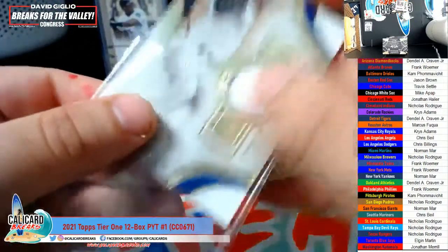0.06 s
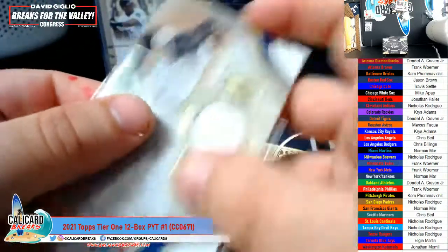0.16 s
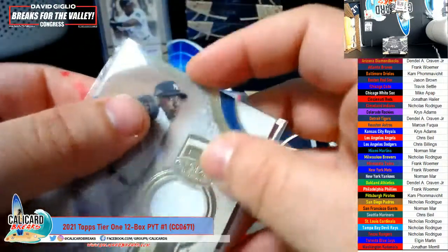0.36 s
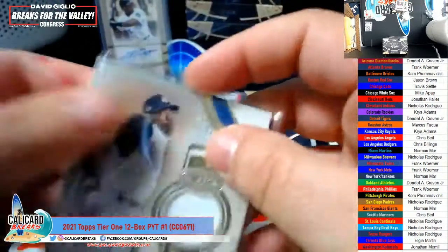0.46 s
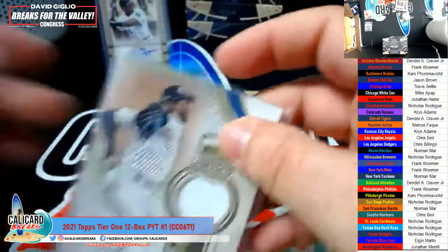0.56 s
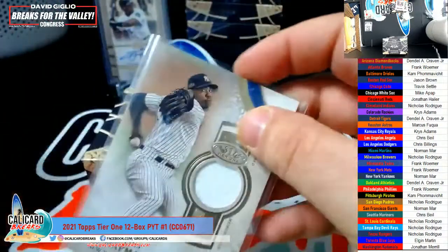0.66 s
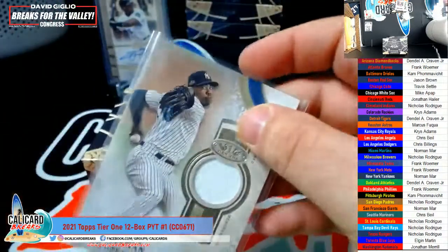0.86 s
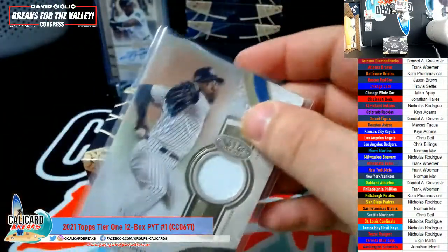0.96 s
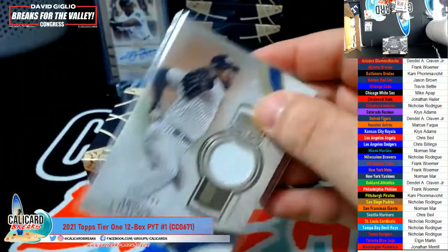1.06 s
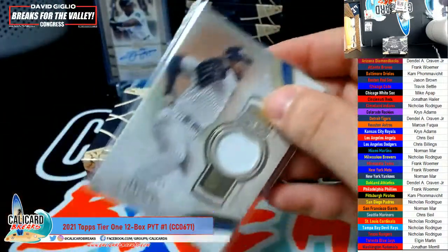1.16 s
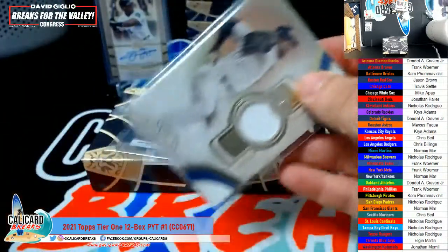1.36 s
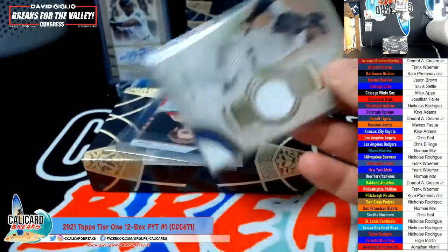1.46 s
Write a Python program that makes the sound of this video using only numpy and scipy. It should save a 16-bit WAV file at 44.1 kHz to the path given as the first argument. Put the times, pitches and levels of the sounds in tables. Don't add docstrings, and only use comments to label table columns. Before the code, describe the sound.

A stiff card hisses into a thin plastic sleeve with sharp snaps, then faint creaks and rubs

```python
import sys
import numpy as np
from scipy import signal
from scipy.fft import rfft, irfft
from scipy.io import wavfile

SR = 44100
rng = np.random.default_rng(int(sys.argv[2]) if len(sys.argv) > 2 else 0)


def log_audio(samples):
    frames = np.atleast_2d(samples).T
    limited = np.clip(frames, -1, 1)
    pcm = np.round(limited * 32767).astype(np.int16)
    wavfile.write(sys.argv[1], SR, pcm)


def volts(x):
    e = np.asarray(x, float) / 20
    return 10 ** e


N = 66150

# freq_hz, density_db
RUMBLE_SPECTRUM = [(12, -38.5), (20, 6), (65, 1.5), (86, -16), (123, -16), (261, -16.5), (351, -12),
                   (387, -21.5), (1000, -37.5), (1300, -72.5), (2200, -120)]
# freq_hz, density_db
HISS_SPECTRUM = [(590, -29), (1000, -2), (1580, -7.5), (1740, -6.5), (2590, -8), (4590, -15), (6770, -11.5),
                 (15000, -26.5), (16500, -31)]
# freq_hz, likeness_0_to_1
PORT_LIKENESS = [(30, .99), (120, .8), (300, 0.9), (800, .7), (2000, 0), (8000, .2)]
# pitch_hz, level_db
MACHINE_TONES = [(26.9, -61), (59.2, -63), (118.4, -64.5), (290.7, -75), (349.9, -70)]
# start_s, length_s, level_db, pitch_hz, width_hz
CREAKS = [(.860, 0.028, -60, 269.6, 50.2), (0.914, 0.02, -64.5, 630, 69.8), (.945, 0.027, -60, 544, 69.5),
          (0.947, 0.027, -67, 1237, 80), (0.996, 0.01, -64, 671, 120), (1.020, 0.015, -48, 550, 110),
          (1.033, .006, -41, 575, 70), (1.032, .012, -54.5, 809, 160), (1.130, .008, -52, 750, 130),
          (1.146, 0.031, -58.5, 228, 39.8), (1.168, .012, -53.5, 2550, 280), (1.181, .007, -53, 2500, 260),
          (1.17, 0.015, -65, 844, 99), (1.240, .008, -41, 2200, 170), (1.238, 0.0087, -53, 1116, 161),
          (1.250, .007, -44, 2196, 200), (1.247, 0.018, -55.5, 1183, 121), (1.269, 0.0167, -52, 324.3, 91),
          (1.269, 0.016, -58, 830, 240), (1.296, 0.019, -57.5, 301, 69.5), (1.394, 0.03, -60, 292, 35),
          (.73, 0.052, -60.5, 355, 29.8), (1.240, 0.0047, -52, 2760, 300), (1.42, .03, -62, 312, 35),
          (1.445, .03, -65, 335, 35)]
# start_s, length_s, level_db, centre_hz, width_octaves
RUBS = [(0.51, 0.017, -63.5, 9500, 0.34), (.507, 0.019, -66, 5000, 3.0), (.640, .04, -80, 6700, 1.5),
        (0.84, .06, -71, 1100, 1.6), (.938, .01, -70, 8000, 1.6), (0.904, 0.11, -64.5, 670, 1.21),
        (1.018, 0.071, -67, 970, 1.6), (1.146, 0.067, -68, 3500, 1.6), (1.236, 0.038, -65, 5300, 1.9),
        (1.255, 0.036, -56, 600, 1.7), (1.404, .011, -58, 7300, 1.0), (1.426, .013, -60.5, 7500, 1.0),
        (1.392, .056, -67, 7000, 1.4), (1.479, 0.008, -72, 1800, 2.9), (1.075, 0.36, -69, 710, 1.6),
        (1.236, 0.025, -66, 1100, 1.06), (1.261, 0.041, -70.5, 6200, 1.5), (1.198, .035, -71, 4500, 1.8),
        (1.424, .022, -68, 1200, 1.58), (1.021, 0.03, -77, 5400, 0.8), (1.02, .03, -68, 2300, 1.3),
        (.935, .045, -73, 2500, 1.1), (1.258, .03, -65, 2300, .6), (1.286, .016, -70, 2300, .6),
        (1.284, .016, -65, 800, 1.6), (1.398, .045, -69, 3200, 1.6), (.325, .035, -63, 1000, 1.2)]
# start_s, peak_db, ring_hz, ring_width_hz, crack_db
SNAPS = [(.23153, -6.5, 8000, 2800, -18), (.23178, -11, 8000, 5000, -14), (.23225, -8, 8000, 3400, -18),
         (.23150, -36, 900, 500, -20), (.23156, -14, 11000, 3200, -30), (.2324, -27, 4100, 1100, -30),
         (.30822, -16.5, 10300, 3800, -40), (.36330, -26, 3400, 2400, -2), (.3633, -36, 1250, 350, -10),
         (.3634, -35, 1800, 500, -10), (.9243, -52, 5600, 4000, -1), (.9390, -50, 8500, 5000, -1),
         (1.4073, -40, 9000, 3000, -20), (1.4275, -44, 1600, 2200, -6), (1.3578, -60, 8800, 4000, -6),
         (1.1310, -62, 6000, 3000, -6), (.5142, -54, 9000, 2000, -6), (.678, -64, 2500, 2000, -3)]
# start_s, peak_db, ring_hz, ring_width_hz, crack_db
SNAPS_LEFT = [
    (.30758, -29, 12800, 3200, -40),
    (.36345, -34, 9500, 4000, -20),
    (.36428, -25, 6000, 3500, -12),
    (.36475, -31, 6000, 3000, -12),
    (.3655, -35, 10500, 2500, -20),
]
# start_s, peak_db, ring_hz, ring_width_hz, crack_db
SNAPS_RIGHT = [
    (.3089, -31, 9000, 2000, -40),
    (.3096, -37, 8000, 2500, -40),
    (.36352, -33, 7500, 4000, -10),
    (.3641, -35, 9500, 2500, -20),
    (.3648, -31, 7000, 3000, -10),
]
# time_s, hiss_db, drag_db (drag relative to hiss level)
SLIDE_COURSE = [(0, -50, -26), (.05, -49.5, -26.5), (.095, -52.5, -16.5), (.15, -46.5, -30),
                (.185, -52, -11), (.205, -60, -14), (.214, -74, -6), (.230, -74, -6), (.234, -59, -12),
                (.262, -62.5, -6), (.298, -62, -8), (.311, -56, -16), (.335, -51, -10), (.358, -52, -3),
                (.385, -55, 0), (0.412, -63, 2), (0.435, -76, -3), (0.469, -92.5, -8)]
# freq_hz, density_db
FILM_SPECTRUM = [(350, -44.5), (600, -17.5), (717, -9.5), (1160, -18), (2800, -18.5), (3830, -9),
                 (9240, -1), (12000, -6.5), (16000, -27)]
# freq_hz, density_db
DRAG_SPECTRUM = [(290, -50), (500, -12), (1360, 1.5), (2690, -6.5), (5310, -7), (11000, -18.5),
                 (16000, -35)]


def at_hz(points, hz):
    p = np.array(points)
    return np.interp(np.log(hz + 1e-9), np.log(p[:, 0]), p[:, 1], left=-90, right=-90)


def drift(rate_hz):
    r = np.exp(-80 * np.pi * rate_hz / SR)
    chance = rng.standard_normal(N // 40 + 2002)
    slow = signal.lfilter([1], [1, -2 * r, r * r], chance)[2000:]
    return np.interp(np.arange(N) / 40, np.arange(len(slow)), slow / slow.std())


def bandpass(x, order, low_hz, high_hz):
    return signal.sosfilt(signal.butter(order, [low_hz, high_hz], "band", fs=SR, output="sos"), x)


def lowpass(x, top_hz):
    return signal.sosfilt(signal.butter(2, top_hz, fs=SR, output="sos"), x)


def coloured(source, spectrum, alike=None):
    hz = np.arange(N // 2 + 1) * SR / N
    if alike is None:
        alike = np.interp(hz, *np.transpose(PORT_LIKENESS))
    alike = np.clip(alike, 0, 1)
    mid, side = rfft(source) * volts(at_hz(spectrum, hz))
    signs = np.array([[1], [-1]])
    out = irfft(np.sqrt(1 + alike) * mid + np.sqrt(1 - alike) * side * signs, N)
    return out / out.std()


def ports(x, pan_db, lag_s):
    shadow_hz = 1500
    hz = np.arange(N // 2 + 1) * SR / N
    pan = volts(pan_db / 2 * hz ** 2 / (hz ** 2 + shadow_hz ** 2))
    delay = np.exp(-2j * np.pi * hz * lag_s)
    return irfft(rfft(x) * np.array([pan, delay / pan]), N)


def room():
    rumble = coloured(rng.standard_normal((2, N)), RUMBLE_SPECTRUM)
    rumble = signal.sosfilt(signal.butter(2, 130, "high", fs=SR, output="sos"), rumble)
    deep = coloured(rng.standard_normal((2, N)), [(18, -8), (45, -6.5), (90, -1.5), (140, -15)])
    hiss = coloured(rng.standard_normal((2, N)), HISS_SPECTRUM) * volts(.8 * drift(3.6))
    return volts(-63.5) * rumble / rumble.std() + volts(-69.5) * deep + volts(-75) * hiss


def machine_hum():
    wobble_db, wander_rad = 3, .5
    t = np.arange(N) / SR
    out = np.zeros(N)
    for hz, db in MACHINE_TONES:
        level = np.sqrt(2) * volts(db + wobble_db * drift(9.7))
        out += level * np.sin(2 * np.pi * hz * t + wander_rad * drift(3.0))
    return out


def creaks():
    roughness = .5
    size = 8192
    out, t = np.zeros(N + size), np.arange(size) / SR
    for s, length, db, hz, width_hz in CREAKS:
        slips = rng.standard_normal(size)
        r, w = np.exp(-np.pi * width_hz / SR), 2 * np.pi * hz / SR
        push = np.sin(np.pi * np.clip(t / length, 0, 1) ** 0.51)
        core = np.sin(2 * np.pi * hz * t + slips[0])
        drive = core + roughness * slips / np.sqrt(np.pi * width_hz / SR)
        ring = signal.lfilter([1, 0, -1], [1, -2 * r * np.cos(w), r * r], push * drive)
        ring = lowpass(ring, 1.8 * hz)
        rms = np.sqrt(np.sum(ring ** 2) / (length * SR))
        i = int(s * SR)
        out[i:i + size] += volts(db) * ring / rms
    return ports(lowpass(out, 3600)[:N], pan_db=5, lag_s=.00017)


def finger_rubs():
    size = 4096
    out, t = np.zeros((2, N + size)), np.arange(size) / SR
    for s, length, db, hz, octaves in RUBS:
        grain_db = 3.0 * np.minimum(rng.exponential(1, size), 4)
        noise = rng.standard_normal((3, size)) * volts(grain_db)
        pair = noise[0] + 1.07 * noise[1:]
        half = 2 ** (octaves / 2)
        puff = bandpass(pair, 3, hz / half, min(hz * half, .45 * SR))
        shape = np.sin(np.pi * np.clip(t / length, 0, 1) ** 0.52)
        i = int(s * SR)
        out[:, i:i + size] += volts(db) * shape * puff / puff.std()
    return out[:, :N] * volts([[1.5], [-1.5]])


def film_snaps(table, pan_db):
    tail_db, tail_t60_s = -21, 0.018
    size = 2048
    clicks, tails, t = np.zeros(N), np.zeros((2, N)), np.arange(size) / SR
    crack = bandpass(-1. * (t == 0), 2, 710, 12500)
    crack = crack / np.abs(crack).max()
    for s, db, hz, width_hz, crack_db in table:
        rise = np.pi * width_hz * t
        ring = -np.e * rise * np.exp(-rise) * np.sin(2 * np.pi * hz * t)
        i = int(s * SR)
        clicks[i:i + size] += volts(db) * (ring + volts(crack_db) * crack)
        rustle = bandpass(rng.standard_normal((2, size)), 1, hz / 1.6, min(hz * 1.25, .45 * SR))
        tails[:, i:i + size] += volts(db + tail_db - 60 * t / tail_t60_s) * rustle
    return ports(clicks, pan_db, lag_s=.000027) + tails


def card_slide():
    grains_per_s, grain_db, pan_db = 20000, 2.0, 3
    s, hiss_db, drag_db = np.transpose(SLIDE_COURSE)
    t = np.arange(N) / SR
    level = volts(np.interp(t, s, hiss_db, right=-120))
    strength = volts(grain_db * np.minimum(rng.exponential(1, (2, N)), 2))
    slipping = rng.random((2, N)) < grains_per_s / SR
    grains = rng.standard_normal((2, N)) * strength * slipping
    film = coloured(grains, FILM_SPECTRUM, alike=.1) * volts(1.1 * drift(40.0))
    drag = coloured(rng.standard_normal((2, N)), DRAG_SPECTRUM, alike=.4)
    drag = drag * volts(np.interp(t, s, drag_db))
    return level * (film + drag) * volts([[pan_db / 2], [-pan_db / 2]])


def scene():
    handling = creaks() + finger_rubs()
    snaps = film_snaps(SNAPS, 6) + film_snaps(SNAPS_LEFT, 14) + film_snaps(SNAPS_RIGHT, -14)
    return room() + machine_hum() + handling + snaps + card_slide()


def roll_off(x):
    return signal.sosfilt(signal.butter(12, 16800, fs=SR, output="sos"), x)


def record(dry):
    x = signal.sosfilt(signal.cheby2(12, 70, 17250, fs=SR, output="sos"), dry)
    return roll_off(x)


dry = scene()
out = record(dry)
log_audio(out)
```